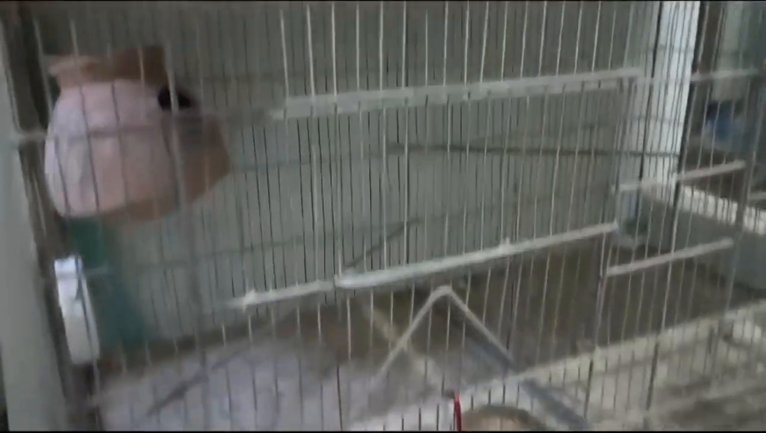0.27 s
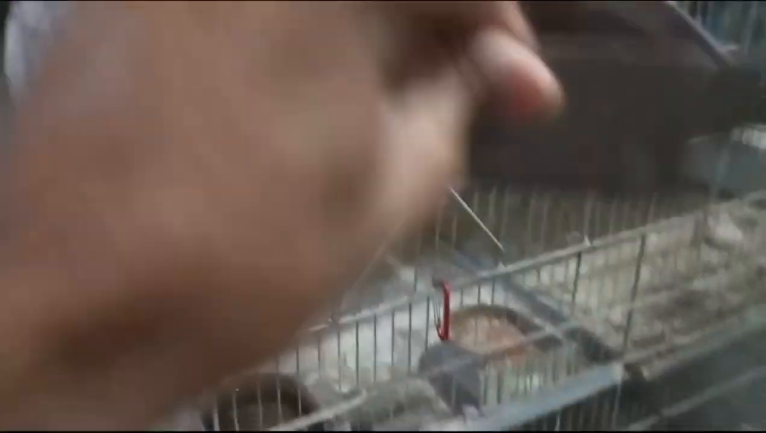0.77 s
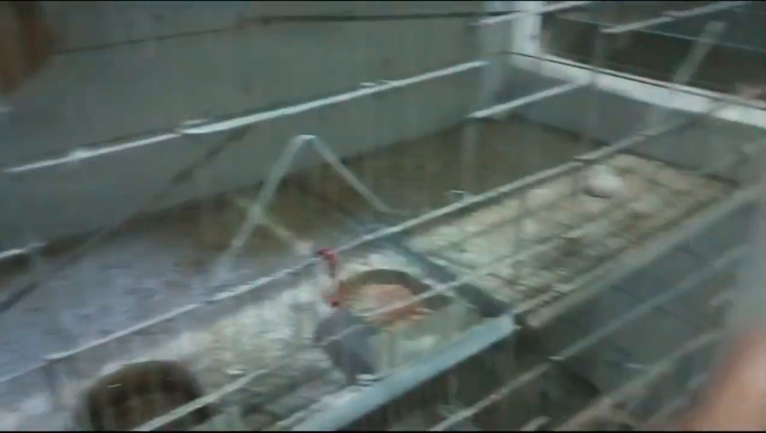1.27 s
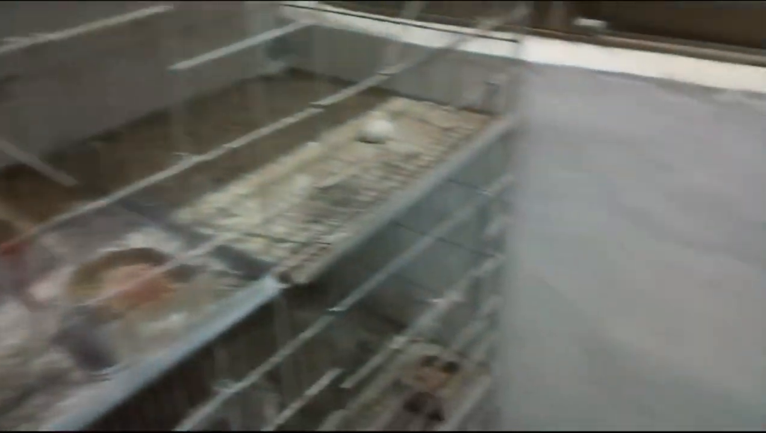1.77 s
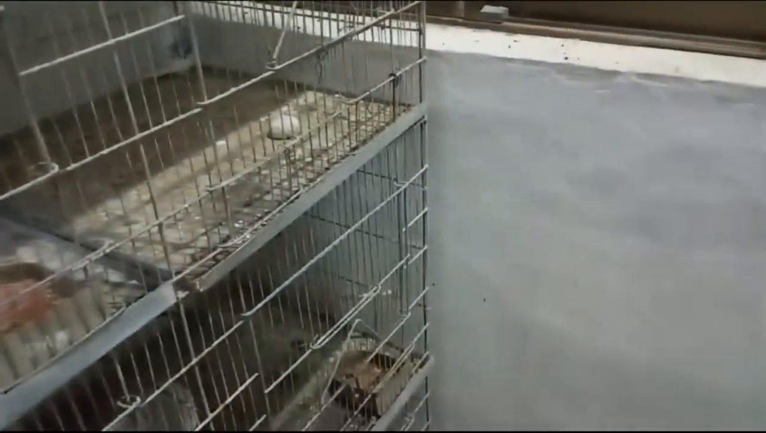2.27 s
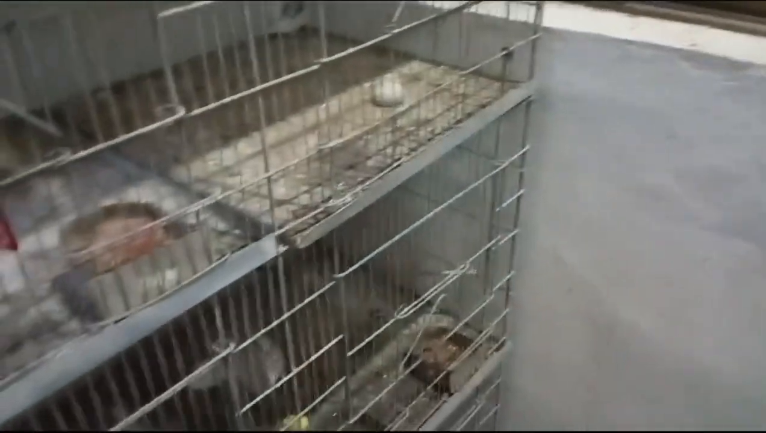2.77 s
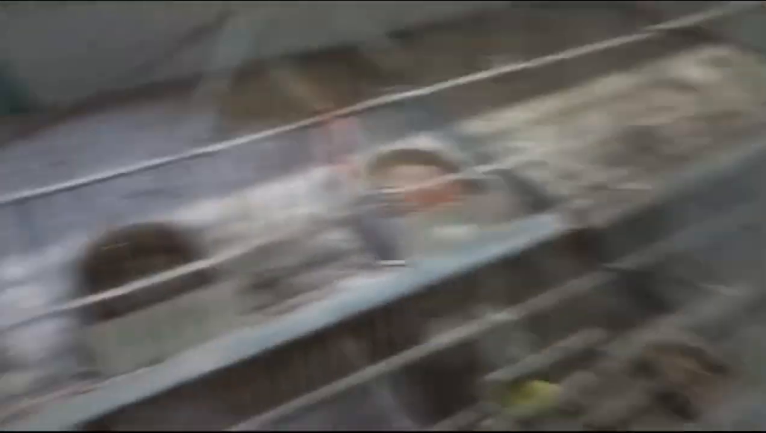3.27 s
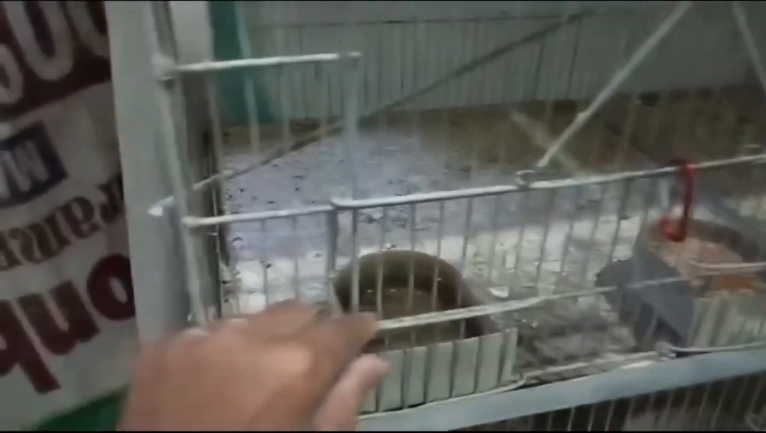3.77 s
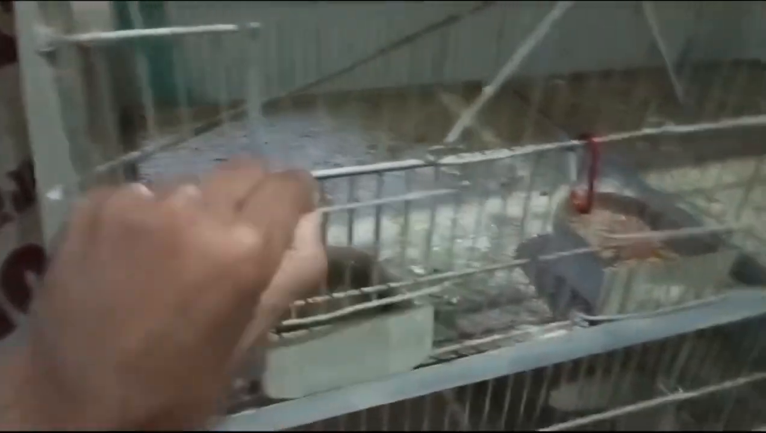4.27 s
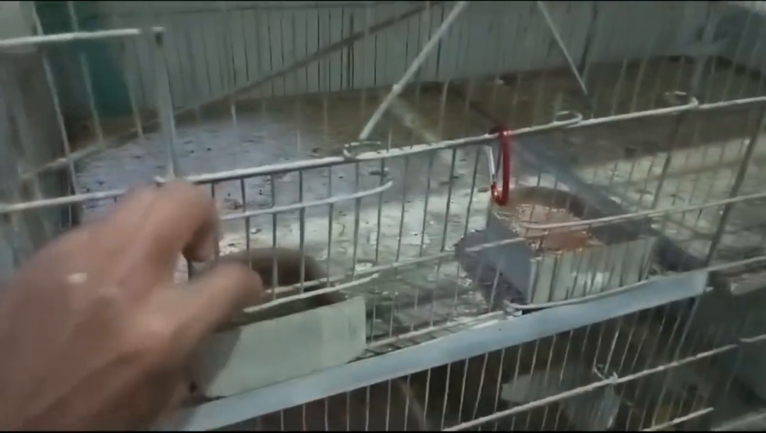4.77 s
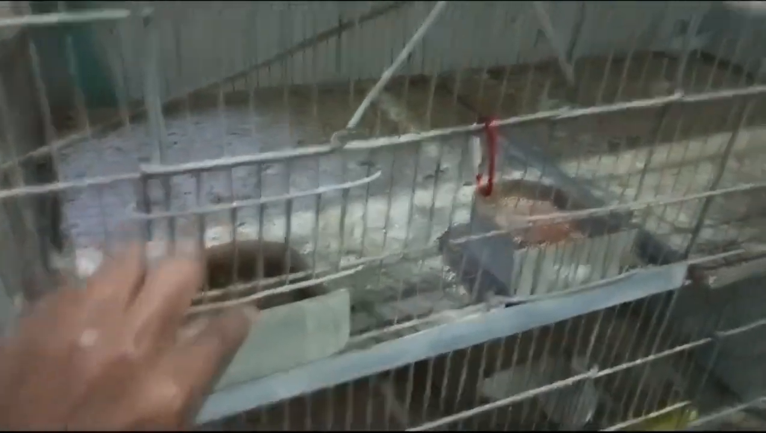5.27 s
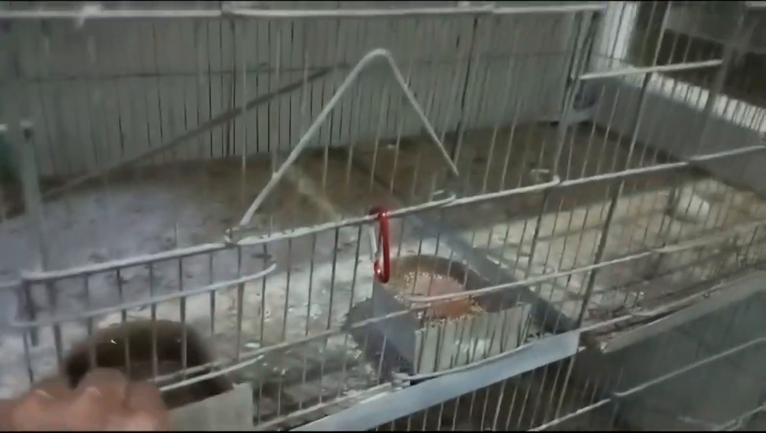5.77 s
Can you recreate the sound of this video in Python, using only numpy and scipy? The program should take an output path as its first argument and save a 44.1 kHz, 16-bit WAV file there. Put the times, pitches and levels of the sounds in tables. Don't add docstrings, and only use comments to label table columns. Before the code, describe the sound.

Finches give short nasal beeps and raspy calls, with one piercing chirp, while wings flutter and a wire cage knocks and rattles in a bare room.

```python
import sys
import numpy as np
from scipy import signal
from scipy.fft import rfft, irfft, next_fast_len
from scipy.io import wavfile
from scipy.ndimage import uniform_filter1d, map_coordinates

SR = 44100
rng = np.random.default_rng(int(sys.argv[2]) if len(sys.argv) > 2 else 0)


def amplitude_ratio(level_db):
    exponent = np.asarray(level_db, float) / 20
    return 10 ** exponent


def materialize(psi):
    bounded = np.clip(np.atleast_2d(psi).T, -1, 1)
    quanta = np.round(bounded * 32767).astype(np.int16)
    wavfile.write(sys.argv[1], SR, quanta)


N = 264688
STEP = 32

# (time [s], length [s], pitch [Hz], level [dB], beak resonance [Hz])
CLEAR_CALLS = [(1.081, 0.035, 829, -36.5, 3400), (1.503, 0.096, 612, -33, 2640),
               (1.657, 0.099, 637, -33.5, 2680), (1.793, .04, 559, -43, 2970),
               (2.337, 0.05, 807, -40.5, 2800), (2.412, 0.039, 582, -41.5, 2900),
               (2.654, 0.1, 566, -36.5, 3100), (3.462, .058, 617, -29.5, 3400),
               (4.514, 0.038, 816, -36, 3230), (4.688, 0.065, 554, -38, 3000),
               (5.139, 0.032, 819, -35.5, 3200), (5.217, 0.042, 573, -39, 3330),
               (5.348, 0.072, 585.5, -32.5, 3820), (5.512, .15, 619, -34.5, 2830)]
BLURRED_CALLS = [(0.147, 0.057, 658, -38, 2280), (0.309, 0.045, 812, -33, 2410),
                 (0.724, 0.085, 595, -32, 3560), (0.818, 0.0495, 638, -29.5, 3900),
                 (1.978, 0.083, 765.5, -33.5, 3200), (2.607, 0.069, 790, -32.5, 3270),
                 (3.439, 0.044, 705, -35, 3030), (4.589, 0.048, 564, -39, 3140),
                 (4.775, 0.048, 804, -37.5, 3520), (5.411, 0.058, 785, -33.5, 3280),
                 (5.903, 0.047, 727, -43.5, 3300)]
HARSH_CALLS = [(.001, 0.072, 720, -38.5, 2900), (0.843, 0.073, 638, -18, 3950),
               (1.354, .085, 598, -31.5, 3150), (1.56, 0.061, 634, -37.5, 5600),
               (1.833, 0.079, 633, -31.5, 4040), (2.176, 0.083, 888, -41, 5250),
               (2.457, 0.068, 632, -32.5, 3240), (2.784, 0.063, 579, -41.5, 3060),
               (4.641, 0.059, 587, -27.5, 3350), (4.799, 0.058, 610, -29.5, 3180),
               (4.958, 0.075, 615, -40.5, 5540), (5.266, 0.051, 608, -28, 3500)]
# (chest lift [dB], brightness [dB], peak [share of length], rise [dB], fall [dB],
# roundness of the top [exponent])
VOICES = [
    (1, -16, 0.399, 10.5, 20, 1.04),
    (-2.5, -11, 0.474, 15.5, 19.5, 1.16),
    (-10, -1, 0.41, 14.5, 33, 0.97),
]
PITCH_JITTER = (.011, .03, .04)
LONGEST_CALL = (6800, 4400, 4600)
# (frequency [Hz], level [dB])
THROAT = [(400, -44), (700, -18.5), (1200, -9), (2000, -3.5), (2600, -4), (3300, 1), (4200, -3.5),
          (5500, -9), (7000, -19), (8000, -33), (10000, -22), (13000, -77)]
# (frequency [Hz], level [dB])
RASP = [(500, -67), (1200, -15.5), (2200, -27), (2900, 2.5), (3600, 4), (4400, -5.5), (5500, -13.5),
        (7000, -30), (8000, -59), (10000, -30), (13000, -75)]
# (time [s], pitch [Hz], level [dB])
CHIRP_WHISTLES = [
    [(1.138, 4570, -50), (1.152, 3690, -25), (1.17, 3120, -20.5), (1.193, 3200, -24)],
    [(1.177, 1950, -36), (1.182, 1723, -12), (1.19, 1840, -44), (1.23, 1770, -45)],
    [(1.183, 2600, -30.5), (1.204, 2590, -14), (1.217, 2510, -14.5)],
    [(1.203, 3616, -14.5), (1.215, 3494, -20), (1.24, 3520, -28)],
    [(1.203, 4250, -25), (1.21, 4380, -24.5), (1.228, 2750, -3)],
    [(1.222, 2907, -11.5), (1.232, 2830, -14), (1.245, 2910, -26.5), (1.258, 2680, -25)],
]
# (frequency [Hz], t60 [s])
ROOM_DECAY = [(300, 0.23), (3000, 0.26), (10000, 0.12)]

# (time [s], wing stirring [dB], cage shaking [dB])
STIRRING = [(0, -41.5, -37), (.28, -53.5, -42.5), (.62, -51, -44.5), (.8, -63, -49), (1.049, -51, -47.5),
            (1.3, -47.5, -54.5), (1.5, -45, -49.5), (1.95, -56, -51), (2.4, -68, -49), (2.8, -57, -51),
            (3.299, -68, -55.5), (3.62, -77, -49), (3.85, -81, -57), (4.33, -39.5, -36.5),
            (4.6, -49.5, -41), (5.1, -56, -48.5), (5.5, -46, -51), (6, -53, -51)]
# (time [s], length [s], wing beat [dB], feather hiss over it [dB], wire rattle over it [dB])
FLURRIES = [(.001, 0.29, -51, 1.5, 11), (0.32, 0.12, -49, 10, -15), (0.353, .22, -35.5, 1.5, 2),
            (0.711, 0.15, -45, -9.5, 3.5), (0.817, 0.14, -39, -14.5, -5), (1.123, 0.13, -37.5, -19, -21),
            (1.339, 0.074, -43.5, -8.5, -24), (1.595, 0.34, -49, -5, 1), (1.971, 0.072, -43.5, -17, -17),
            (2.068, .2, -46, -37, -4), (2.588, 0.13, -42.5, -10.5, -13), (2.918, 0.39, -70.5, 8.5, 10),
            (3.375, 0.12, -60, 2.5, 20), (3.53, 0.22, -57.5, -22, 1), (3.851, .17, -42.5, -16.5, -13),
            (4.086, 0.1, -38, -17, -25), (4.17, 0.18, -45, -10, 5), (4.241, .15, -31, -1.5, 0),
            (4.413, 0.06, -48, -16, -7), (4.537, .08, -42, -3, -31), (4.77, 0.097, -43, -9, 3.5),
            (4.864, 0.16, -46.5, -9, -11), (5.335, 0.075, -48, -9, -18), (5.642, 0.28, -58.5, 7, -13)]
# (time [s], length [s], level [dB])
SHOVES = [
    (0.344, 0.39, -41),
    (2.994, 0.26, -55),
    (3.418, 0.52, -50.5),
    (4.258, 0.28, -38),
    (4.5, 0.45, -47.5),
]
# (time [s], peak [dB], t60 [s], body [dB])
KNOCKS = [(0.3593, -10, 0.44, -2.5), (1.001, -33.5, 0.16, -3), (2.952, -41, 0.27, -9),
          (3.393, -46, 0.35, 14), (3.445, -32, 0.28, 16.5), (3.638, -38.5, 0.19, 3),
          (3.697, -38.5, 0.18, 4), (3.791, -46, 0.09, -16), (4.0098, -40, 0.17, -13),
          (4.0977, -34.5, 0.17, 13.5), (4.249, -18.5, 0.45, 9), (4.437, -30.5, 0.32, -8),
          (4.555, -24, 0.27, -17), (5.3495, -33, 0.2, -12)]
# (frequency [Hz], width [Hz], level [dB])
WIRE_MODES = [(243, 9, 1), (372, 7, 5), (1100, 12, -5), (1535, 5, 1), (1783, 5, 6), (2000, 30, -3),
              (3545, 14, -2), (5750, 60, -8)]
# (time [s], peak [dB])
HUSK_CRACKS = [
    (2.4942, -41),
    (2.5273, -29),
    (5.0998, -44),
]
# (time [s], length [s], level [dB])
DISH_PUSHES = [
    (3.504, 0.26, -48.5),
    (5.87, .2, -49),
]

# (frequency [Hz], density [dB per Hz])
FEATHER_SPECTRUM = [(2940, -23.5), (5000, -11), (5970, -6), (7820, -16), (9260, -7), (10800, -6.5),
                    (15000, -41.5), (15800, -51)]
BEAT_SPECTRUM = [(880, -8.5), (1500, -1.5), (1790, -4), (2640, 1.5), (3250, 2), (5810, -8), (7500, -19),
                 (9750, -57), (16500, -120)]
FIZZ_SPECTRUM = [(9000, -15), (12000, 0), (15500, -7), (16000, -7)]
RATTLE_SPECTRUM = [(260, -10), (450, -15.5), (784, -2.5), (1080, -4), (1340, -0.5), (1730, 4.5),
                   (2100, -4.5), (3000, -7.5), (3900, -41), (6600, -120)]
TRAY_SPECTRUM = [(71, -41), (120, -11.5), (161, -2.5), (242, -2.5), (296, -2), (372, -7), (600, -8.5),
                 (780, -61), (1320, -120)]
STAND_SPECTRUM = [(30, -39), (60, -11), (102, 7), (130, 11), (170, -26.5)]
SCRAPE_SPECTRUM = [(400, -7), (700, -4.5), (810, 3.5), (950, -4), (1600, -40)]
HUM_SPECTRUM = [(24, -26), (40, 0.5), (83, 5), (209, -0.5), (431, -11), (805, -8.5), (890, -12),
                (1620, -21.5), (2300, -22), (3190, -4.5), (3890, -15), (6110, -13), (7460, -25.5),
                (10300, -12), (15800, -47)]

SCOOP, SAG = 0.088, 0.029
HIGH_BIRD_HZ = 690
HARSH_DROP_PER_S = 1.3
CHEST_DB_PER_KHZ, BRIGHT_DB_PER_KHZ = 1, 4
HISS_DB, RUMBLE_DB = -20, -9.5
TRAY_DB, SHOVE_RATTLE_DB = -12.5, -12
STRIKE_DB = 26
RING_ON_S = 0.18
FIZZ_DB, FIZZ_GROWS = -10.5, 1.2
BOOM_DB, BOOM_GROWS = -12, 1.04


def unit(x):
    return x / np.sqrt(np.mean(x ** 2) + 1e-20)


def along(points, hz):
    f, v = np.transpose(points)
    return np.interp(np.log(hz + 1), np.log(f + 1), v)


def wobble(rate, size=N):
    knots = rng.standard_normal(int(size * rate / SR) + 4)
    return map_coordinates(knots, [np.arange(size) * rate / SR])


def filtered(x, response):
    m = next_fast_len(N + SR // 2)
    return irfft(rfft(x, m) * response(np.fft.rfftfreq(m, 1 / SR)), m)[:N]


def rustle(spectrum, grain_db, grain_rate, patchy_db=3.0):
    grainy = rng.standard_normal(N) * amplitude_ratio(grain_db * wobble(grain_rate))
    z = signal.stft(grainy, nperseg=256)[2]
    patches = uniform_filter1d(rng.standard_normal(z.shape), size=6, axis=0)
    patches = uniform_filter1d(patches, size=12, axis=1)
    grains = signal.istft(z * amplitude_ratio(patchy_db * unit(patches)), nperseg=256)[1][:N]
    return unit(filtered(grains, lambda hz: amplitude_ratio(along(spectrum, hz))))


def add(track, start, x):
    track[start:start + len(x)] += x[:len(track) - start]


def swell(start, length):
    u = np.clip((np.arange(0, N, STEP) / SR - start) / length, 0, 1)
    return np.abs(np.sin(np.pi * u ** 0.68)) * (u < 1)


def smooth(control):
    return np.interp(np.arange(N), np.arange(len(control)) * STEP, control)


def stack(pitch, throat, jitter, chest_db, bright_db, beak_hz, shimmer_db):
    k = np.arange(1, 20)[:, None]
    unsteady = pitch * (1 + (.009 + jitter) * wobble(350, size=len(pitch)))
    phase = 2 * np.pi * np.cumsum(unsteady) / SR
    hz = k * pitch
    bright = (bright_db + 12.5) * np.clip((hz - 3800) / 1500, 0, 1)
    chest = chest_db * (hz < 2300) * (k > 1)
    beak = 7.8 * np.exp(-((hz - beak_hz) / 450) ** 2)
    flicker = 3.6 * wobble(70.34, size=k.size * len(pitch)).reshape(k.size, -1)
    gain = amplitude_ratio(along(throat, hz) + bright + chest + beak + flicker)
    harmonics = np.sum(gain * np.sin(k * phase + 0.289 * k * k), axis=0)
    tone = harmonics / np.sqrt(np.sum(gain ** 2, axis=0) / 2)
    return tone * amplitude_ratio(shimmer_db * wobble(195, size=len(pitch)))


def nasal_voice(pitch_hz, beak_hz, jitter, chest_db, bright_db, before, after):
    bend = SCOOP * (pitch_hz < HIGH_BIRD_HZ) * before ** 2 + SAG * after ** 2
    chest = chest_db + CHEST_DB_PER_KHZ * (3000 - beak_hz) / 1000
    bright = bright_db + BRIGHT_DB_PER_KHZ * (beak_hz - 3000) / 1000
    return stack(pitch_hz * (1 - bend), THROAT, jitter, chest, bright, beak_hz, shimmer_db=0.5)


def harsh_voice(pitch_hz, beak_hz, jitter, chest_db, bright_db, t):
    pitch = pitch_hz * (1 - HARSH_DROP_PER_S * t)
    return amplitude_ratio(-3.5) * stack(pitch, RASP, jitter, chest_db, bright_db, beak_hz, shimmer_db=3)


def calls():
    out = np.zeros(N)
    kinds = zip((CLEAR_CALLS, BLURRED_CALLS, HARSH_CALLS), PITCH_JITTER, LONGEST_CALL, VOICES)
    for rows, jitter, size, (chest_db, bright_db, peak, rise_db, fall_db, rounded) in kinds:
        t = np.arange(size) / SR
        for start, length, pitch_hz, db, beak_hz in rows:
            before = np.clip(1 - t / length / peak, 0, 1)
            after = np.clip((t / length - peak) / (1 - peak), 0, 1)
            edges = np.clip(np.minimum(t, length - t) / 0.0021, 0, 1)
            level = edges * amplitude_ratio(db - rise_db * before ** rounded - fall_db * after ** rounded)
            if rows is HARSH_CALLS:
                voice = harsh_voice(pitch_hz, beak_hz, jitter, chest_db, bright_db, t)
            else:
                voice = nasal_voice(pitch_hz, beak_hz, jitter, chest_db, bright_db, before, after)
            add(out, round(start * SR), level * voice)
    return out


def room(x):
    hz, t, z = signal.stft(rng.standard_normal(SR // 2), SR, nperseg=256)
    decay = amplitude_ratio(-60 * t / along(ROOM_DECAY, hz)[:, None])
    tail = signal.istft(z * decay, SR, nperseg=256)[1]
    delayed = np.pad(x, (130, 0))
    return signal.fftconvolve(delayed, tail / np.linalg.norm(tail))[:N]


def hum():
    return amplitude_ratio(-57) * rustle(HUM_SPECTRUM, 0.33, 6.75, patchy_db=2.5)


def restlessness():
    s, *levels = np.transpose(STIRRING)
    return [np.interp(np.arange(0, N, STEP) / SR, s, db) for db in levels]


def motion():
    t = np.arange(0, N, STEP) / SR
    wing_db, shake_db = restlessness()
    hiss, beat = amplitude_ratio(wing_db + HISS_DB), amplitude_ratio(wing_db)
    rattle, rumble = amplitude_ratio(shake_db), amplitude_ratio(shake_db + RUMBLE_DB)
    for start, length, db, hiss_db, rattle_db in FLURRIES:
        stroke = amplitude_ratio(db) * swell(start, length)
        hiss = np.hypot(hiss, amplitude_ratio(hiss_db) * stroke)
        beat = np.hypot(beat, stroke)
        rattle = np.hypot(rattle, amplitude_ratio(rattle_db) * stroke)
        rumble = np.hypot(rumble, amplitude_ratio(rattle_db + TRAY_DB) * stroke)
    for start, length, db in SHOVES:
        push = amplitude_ratio(db) * swell(start, length)
        rumble = np.hypot(rumble, push)
        rattle = np.hypot(rattle, amplitude_ratio(SHOVE_RATTLE_DB) * push)
    for start, db, t60, body_db in KNOCKS:
        since = np.abs(t - start)
        dying = (t >= start) * amplitude_ratio(db - 15 - 60 * since / t60)
        hiss = np.hypot(hiss, dying)
        rattle = np.hypot(rattle, amplitude_ratio(body_db) * dying)
        beat = np.hypot(beat, amplitude_ratio(-1.0) * dying)
        hiss = hiss + amplitude_ratio(-3) * dying * amplitude_ratio(-60 * since / .01)
    keep = amplitude_ratio(-60 * STEP / SR / RING_ON_S) ** 2
    stored = signal.lfilter([1 - keep], [1, -keep], rattle ** 2)
    rattle = np.sqrt(np.maximum(rattle ** 2, stored))
    return map(smooth, (hiss, beat, rattle, rumble))


def feathers(hiss, beat):
    flutter = amplitude_ratio(1.5 * wobble(14))
    rubbing = hiss * rustle(FEATHER_SPECTRUM, 2.5, 600)
    beating = beat * rustle(BEAT_SPECTRUM, 1.8, 300)
    return flutter * (rubbing + beating)


def fizz(hiss):
    level = amplitude_ratio(FIZZ_DB - 33) * (hiss / amplitude_ratio(-38)) ** FIZZ_GROWS
    return level * rustle(FIZZ_SPECTRUM, 2.4, 600)


def shaking(rattle, rumble):
    wire_rattle = amplitude_ratio(-3.5) * rattle * rustle(RATTLE_SPECTRUM, 0.75, 220)
    return wire_rattle + rumble * rustle(TRAY_SPECTRUM, 0.74, 40, patchy_db=1.5)


def wire_response(f):
    total = 0
    for k, (centre, width, db) in enumerate(WIRE_MODES):
        damping = 1j * f * width
        total = total + (-1) ** k * amplitude_ratio(db) * damping / (centre * centre - f * f + damping)
    return total


def wires(shake, hiss):
    blows = np.zeros(N)
    for start, db, _, body_db in KNOCKS:
        blows[round(start * SR)] = amplitude_ratio(db + body_db + STRIKE_DB)
    brushing = amplitude_ratio(21) * hiss * rng.standard_normal(N)
    return filtered(blows + amplitude_ratio(1) * shake + brushing, wire_response)


def stand():
    shake_db = restlessness()[1]
    level = amplitude_ratio(BOOM_DB - 50 + BOOM_GROWS * (shake_db + 52.5))
    return smooth(level) * rustle(STAND_SPECTRUM, 0.95, 8)


def cage():
    hiss, beat, rattle, rumble = motion()
    shake = shaking(rattle, rumble)
    return feathers(hiss, beat) + fizz(hiss) + shake + wires(shake, hiss) + stand()


def chirp():
    out = np.zeros(N)
    for rows in CHIRP_WHISTLES:
        s, pitch_hz, level_db = np.transpose(rows)
        t = np.arange(s[0], s[-1], 1 / SR)
        pitch, db = np.interp(t, s, pitch_hz), np.interp(t, s, level_db)
        fade = np.clip(np.minimum(t - s[0], s[-1] - t) / .001, 0, 1)
        phase = 2 * np.pi * np.cumsum(pitch * (1 + .019 * wobble(500, size=len(t)))) / SR
        throb = 1 + .6 * np.cos(2 * np.pi * 170 * np.arange(len(t)) / SR - 2.5)
        overtones = amplitude_ratio(-27.5) * np.sin(2 * phase) + amplitude_ratio(-36) * np.sin(3 * phase)
        overtones += amplitude_ratio(-45) * (np.sin(4 * phase) + np.sin(5 * phase))
        add(out, round(s[0] * SR), fade * throb * amplitude_ratio(db - 1.0) * (np.sin(phase) + overtones))
    return out


def husks():
    out = np.zeros(N)
    t = np.arange(SR // 50) / SR
    for start, db in HUSK_CRACKS:
        click = amplitude_ratio(db - 5.0 - 60 * t / 0.016) * rng.standard_normal(len(t))
        add(out, round(start * SR), click)
    return filtered(out, lambda hz: 1 / (1 + (9000 / (hz + 1)) ** 8))


def dish():
    effort = sum(amplitude_ratio(db) * swell(start, length) for start, length, db in DISH_PUSHES)
    return smooth(effort) * rustle(SCRAPE_SPECTRUM, 1.1, 80)


def scene():
    far, near = calls(), chirp()
    birds = near + far + room(amplitude_ratio(-1.0) * near + amplitude_ratio(-1.5) * far)
    return (birds + cage() + husks() + dish() + hum())[None]


def top_cut(x):
    return signal.sosfilt(signal.butter(12, 16690, fs=SR, output="sos"), x)


def record(dry):
    heard = filtered(dry[0], lambda hz: (hz < 15830) * hz ** 2 / (hz ** 2 + 39 ** 2))
    return top_cut(heard[None])


dry = scene()
out = record(dry)
materialize(out)
```